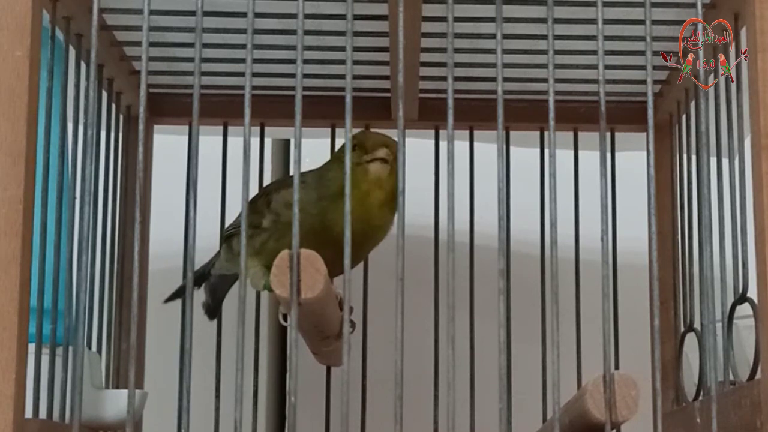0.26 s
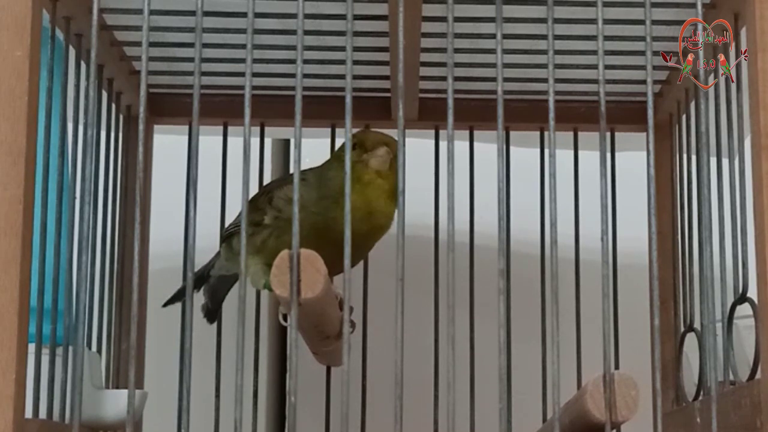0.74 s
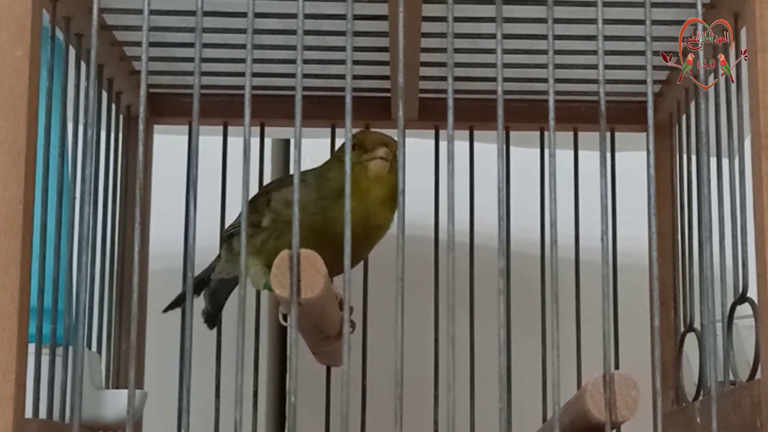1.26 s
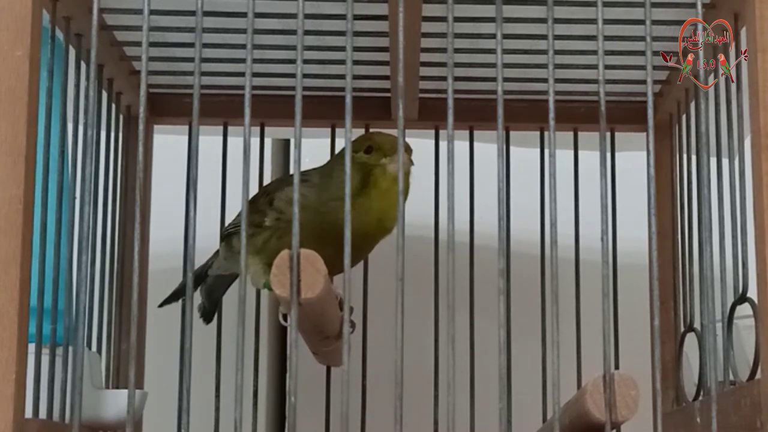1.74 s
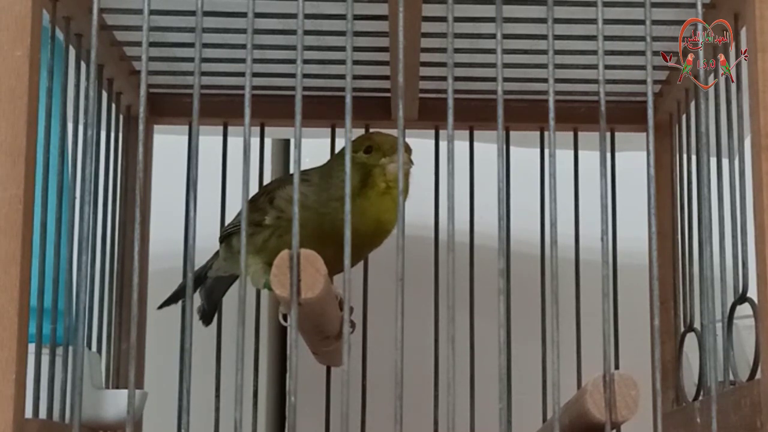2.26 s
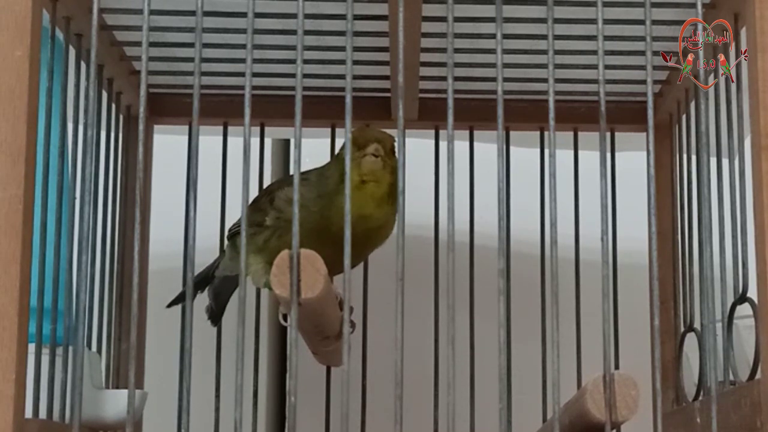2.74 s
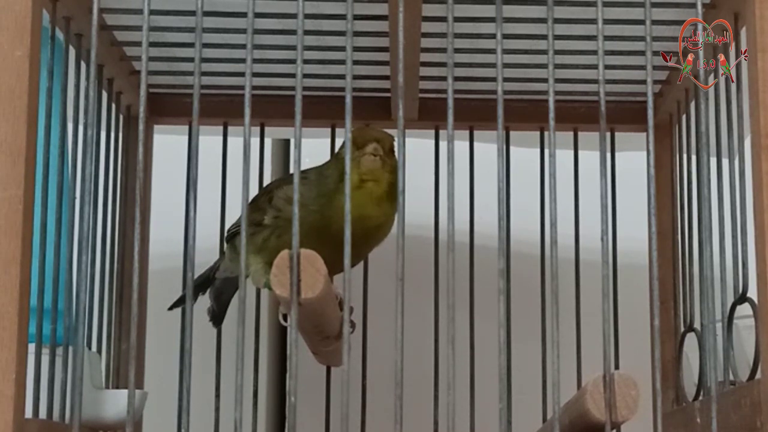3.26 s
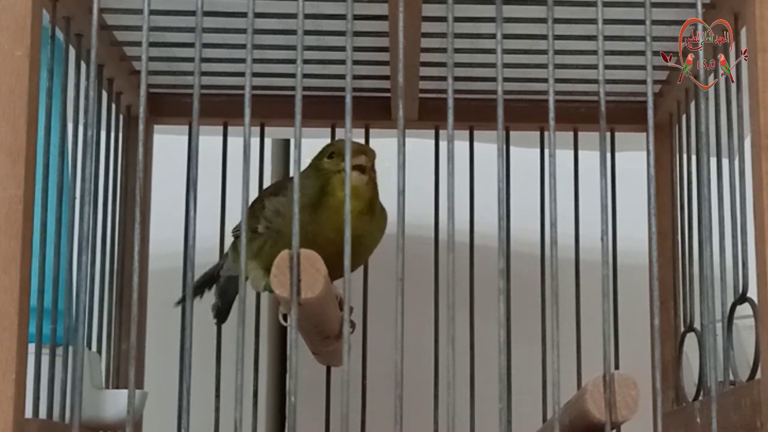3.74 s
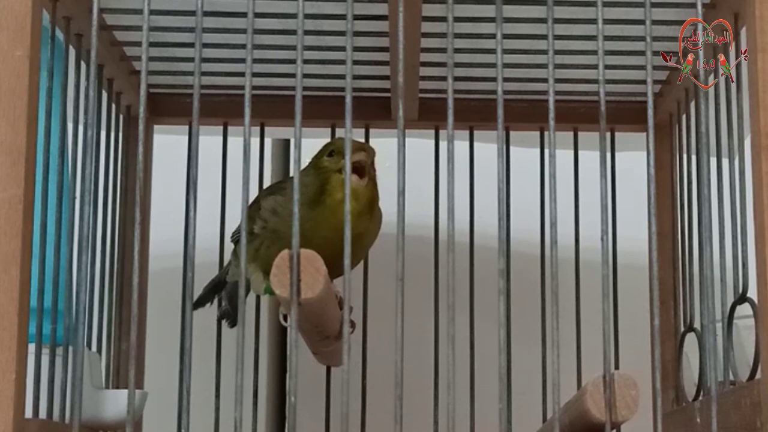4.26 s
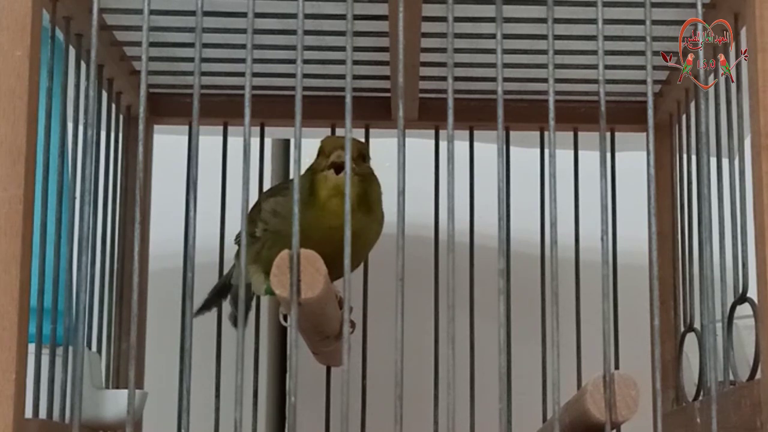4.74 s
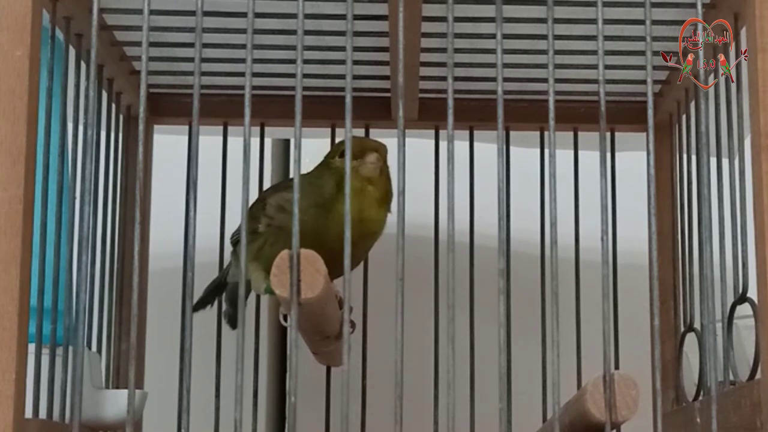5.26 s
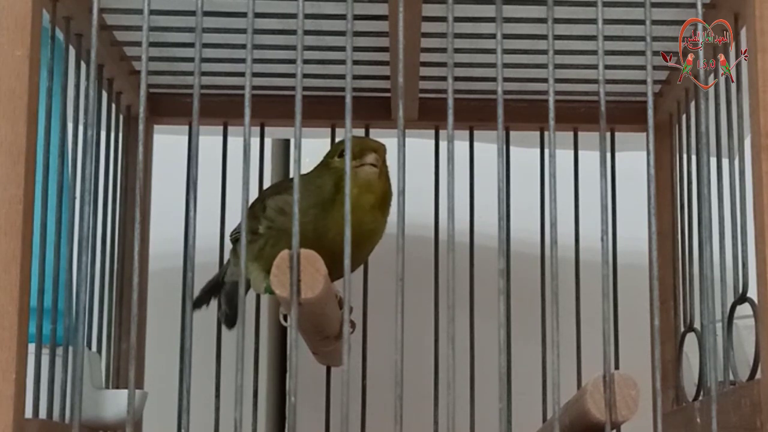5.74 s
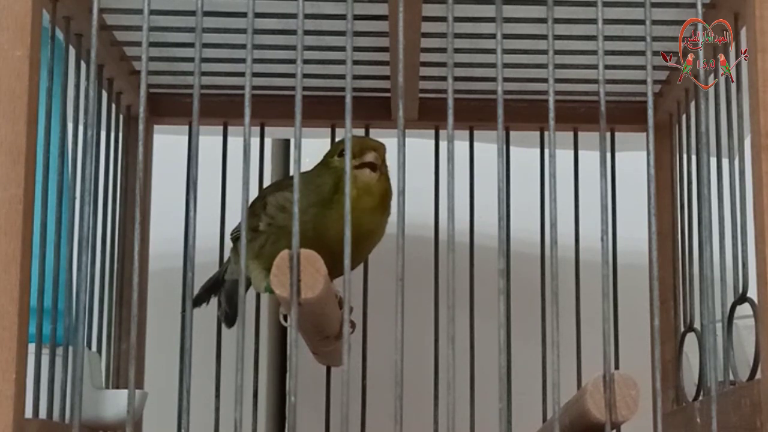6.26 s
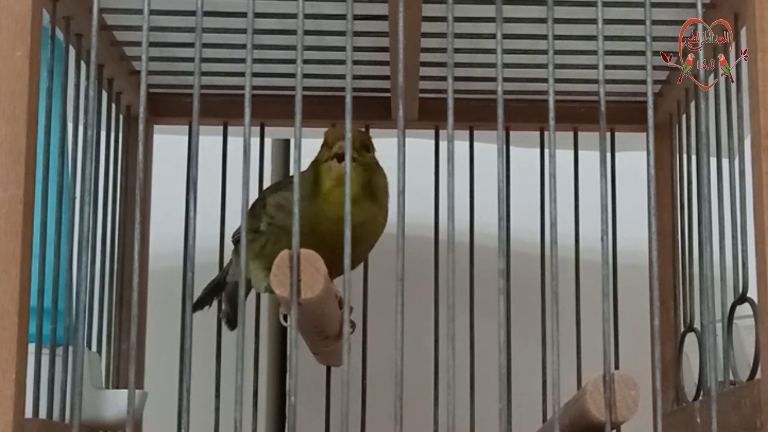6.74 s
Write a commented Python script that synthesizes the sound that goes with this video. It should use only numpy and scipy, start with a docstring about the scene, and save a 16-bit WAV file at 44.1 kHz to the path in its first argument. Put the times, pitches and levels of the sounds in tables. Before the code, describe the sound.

A canary sings close to a stereo microphone inside a wooden cage in a small, quiet room. From 0 to 1 s it gives ten short, dry, falling chips, about ten per second, each led by a scratchy tick. From 1.0 to 1.85 s come four very high upward zips about a quarter second apart, each followed by a tiny low stutter, the later ones preceded by a tick and peep. From 1.9 to 3.7 s, five slower soft whistles climb, the middle three longest and highest, with a faint reedy edge. From 3.75 to 5 s a brisk seesaw trill alternates steady high and rising lower notes, with faint feather rustle. Chips return from 5.05 to 6.15 s. From 6.2 s to the end at about 7.1 s, six louder chirps step downward from thin lisp to full falling note. Light cage ringing, short reverberation, faint air and hum remain underneath.

```python
"""In a small quiet room, inside a wooden cage, a canary sings close to two microphones.
Trills repeat groups of gliding, nearly pure notes, each note a tone with set pitch and level curves.
Among them come five slow rising whistles, where the second side of the syrinx joins faintly and
modulation makes side tones. Cage echoes and resonances and a diffuse room tail return the song;
still air, a low hum and a soft rustle of feathers are shaped noise and a sine."""
import sys
import numpy as np
from scipy import signal
from scipy.fft import rfft, irfft, next_fast_len
from scipy.io import wavfile
from scipy.ndimage import uniform_filter1d

SR = 44100
rng = np.random.default_rng(int(sys.argv[2]) if len(sys.argv) > 2 else 0)


def master(y):
    """Save y as 16-bit WAV."""
    cut = np.clip(np.atleast_2d(y).T, -1, 1)
    pcm = np.round(cut * 32767)  # scale
    wavfile.write(sys.argv[1], SR, pcm.astype(np.int16))


N = 309141  # length [samples]

# Note shapes, all: (time from the start of the note [ms], pitch [Hz], level [dB])
# short, scratchy onset
TICK_SHAPE = [(0.0, 4824, -25.5), (0.9, 4702, 6), (2.1, 4607, 4.5), (4.1, 4690, -2), (4.5, 4470, -29)]
# low falling note
CHIP_SHAPE = [(0.0, 2400, -21), (2.224, 2320, -0.5), (5.56, 2435, 2.5), (8.22, 2290, 3), (9.43, 1840, -6.5),
              (15.4, 1671, -14.5), (21.9, 1520, -24), (27.34, 1675, -25.5)]
# steep rise
SWEEP_SHAPE = [(0, 5300, -13), (3.22, 5890, -1.5), (13.07, 6460, -6), (19.16, 7220, -6), (28.2, 7675, -10),
               (36.5, 7640, -20)]
# arch
PEEP_SHAPE = [(0.0, 880, -38.5), (1.483, 2532.0, -10.5), (5.24, 2790, 0.5), (11.52, 2788.0, -6.5),
              (15.26, 2150, -9), (18.4, 1310, -21), (21.4, 1200, -29)]
# one beat of a stutter
PULSE_SHAPE = [(0, 2330, -25.5), (2, 2420, 9), (3, 2170, 11), (5, 2250, -12.5)]
# long soft slide downwards
FALL_SHAPE = [(0, 1900, -9), (2, 1720, -10.5), (17.4, 1552, -17), (35.7, 1068, -24.5), (52.6, 920, -24),
              (51.6, 950, -50)]
# level high note of the seesaw
HIGH_SHAPE = [(0, 5760, -12), (3, 5520, -3), (12, 5450, -.5), (33, 5415, -.5), (39, 5470, -3),
              (44.5, 5720, -14)]
# rising low note of the seesaw
LOW_SHAPE = [(0, 3720, -13), (4.5, 3687, -11.5), (11.8, 3795, 1), (19.2, 3870, -2.5), (25, 4090, -6.5),
             (27.4, 4330, -18.5)]
# thin, high, nearly level note
LISP_SHAPE = [(0, 6350, -22), (2.1, 6260, -3), (13, 6200, 0), (20, 6230, -14)]
# rise, near hold, last upward flick
SLUR_SHAPE = [(0.0, 3200, -17.5), (5, 4114.0, -2.5), (23.1, 4208.0, 2.5), (33.5, 4296.0, -8),
              (40.4, 4600, -22.5)]
# loud falling note
CHIRP_SHAPE = [(0, 3200, -22), (3.5, 2700, -7.5), (7.8, 2773, -2.5), (14.67, 2288, -1.5),
               (15.76, 1990, -11.5), (20.6, 1760, -23.5), (22.6, 1620, -43)]

# Syllables; levels add to the note shape, factors multiply it.
# two chip trills, a tick and a chip each: (time [s], level [dB], pitch factor [1])
CHIP_SYLLABLES = [(0.0016, -17.5, 1.1), (0.1015, -17, 1.018), (0.2101, -16.5, 1.03), (0.3135, -16.5, 1.035),
                  (0.4149, -16.5, 0.994), (0.525, -17, 1.017), (0.6355, -16, 0.993), (0.7368, -16, .99),
                  (0.8425, -18.5, .965), (0.9556, -17.5, 1), (5.046, -20, 0.989), (5.1548, -17.5, 1.014),
                  (5.258, -19, 0.981), (5.372, -19.5, 0.989), (5.4831, -18, 1.011), (5.583, -18, 1.01),
                  (5.688, -18, .995), (5.7926, -18, 1.02), (5.9021, -17.5, 0.972), (6.021, -20.5, 0.934),
                  (6.141, -20, .955)]
# swooping trill: (time of the sweep [s], level [dB], pitch factor [1], sweep length factor [1])
SWOOP_SYLLABLES = [(1.0345, -20, 0.94, 0.73), (1.2645, -19.5, 0.98, 1.01), (1.4996, -19, 0.99, .98),
                   (1.7438, -19.5, .99, 1)]
# last trill, a lisp, slur and chirp each: (time of the chirp [s], level [dB], pitch factor [1])
CHIRP_SYLLABLES = [(6.2967, -11.5, .985), (6.452, -10.5, 1.002), (6.599, -11, 1.002), (6.7561, -10.5, 0.99),
                   (6.9105, -10, 1), (7.063, -10, .98)]
# pitch of the seesaw's low note: (time [s], factor [1])
SEESAW_PITCH = [(3.76, 0.97), (4.42, 1.029), (4.62, 1.003), (4.9, 1.006)]

# S-shaped climbs: (time [s], length [s], level over the carry [dB], first pitch [Hz], top pitch [Hz],
# climb time [s], lateness [1 = even], sag after it [Hz/s], factor on the second side's pitch [1])
WHISTLE_CLIMBS = [(1.923, 0.17, -3.2, 1897, 2120, 0.21, .5, -7, 1.11),
                  (2.185, 0.38, -2.2, 1885, 3343, 0.23, 0.94, -1.5, 1.02),
                  (2.649, 0.36, -0.42, 1880, 3383, .21, 0.93, 481.5, 0.95),
                  (3.135, .377, -1.5, 1956, 3383, .2, 1.186, 168, 1),
                  (3.594, 0.13, -1.9, 1930, 2251, 0.084, 1.47, 2601.5, 0.95)]
# how strongly a whistle carries through beak and cage: (pitch [Hz], level [dB])
WHISTLE_CARRY = [(1900, -25), (2080, -21.5), (2250, -22.5), (2420, -23.5), (2620, -24), (2820, -16),
                 (3020, -20), (3300, -26.5)]
# second side, falling as the first rises: (whistle pitch [Hz], level re whistle [dB], own pitch [Hz])
SECOND_SIDE_TONE = [(1930, -47, 1400), (2030, -20, 1440), (2354, -24.5, 1440), (2590, -23.5, 1070),
                    (2836, -29.5, 850), (3200, -68, 460)]
# harmonics 2, 3 and 4 before beak colour and brightness: (level [dB])
OVERTONE_LEVELS = [-32.5, -39.5, -52.5]
# how the beak colours the overtones: (frequency [Hz], level [dB])
BEAK_COLOUR = [(4000, 2), (7500, -1.5), (9000, -3.5), (11000, 1), (13400, 4), (15300, 5), (16200, -14.5)]

# microphone pair: (frequency [Hz], left minus right [dB], phase by which left leads [rad])
PORT_BALANCE = [(875, -2, -1.5), (2060, -4.5, 1.35), (3150, -2.5, -1.4), (3582, -3.5, -1.5), (4006, -7, 3),
                (4155, -0.5, -1.5), (5740, 3, -5), (7720, 12.5, -3.5), (10200, -1, -8)]
# cage and near walls: (delay [ms], level [dB])
EARLY_ECHOES = [(3.1, -28.5), (6.8, -21.5), (12.8, -25.5), (25.5, -24.5)]
# narrow cage resonances: (frequency [Hz], width [Hz], level [dB])
CAGE_RINGS = [(3780, 50, -5), (5404, 22, -5)]
# diffuse tail: (frequency [Hz], level [dB], 60 dB decay time [s])
ROOM_TAIL = [(960, -8, 0.46), (2300, -16.5, 0.48), (3500, -7.5, 0.34), (8000, -9.5, 0.34), (14700, 1, 0.09)]
# room air: (frequency [Hz], level [dB per Hz])
AIR_SPECTRUM = [(30, -108), (130, -103), (450, -103.5), (700, -108), (6000, -124), (16000, -129)]
# stirred feathers, relative colour: (frequency [Hz], level [dB])
RUSTLE_SPECTRUM = [(60, -4.5), (180, -6.5), (500, -17), (1700, -4.5), (3500, -24.5)]

SETTLE_SYLLABLES = 1.3  # decay of the tension at the start of a trill
STUTTER_GAP_S, STUTTER_STEP_S, STUTTER_GROWTH_DB = 0.017, 0.0056, 5.5  # pause, spacing, growth per pulse
SEESAW_START_S, SEESAW_BEAT_S = 3.7637, 0.1133
CLING_HZ, CLING_WIDTH_HZ, CLING = 2490, 260, 0.7  # a climbing whistle lingers around one pitch
SHORTEST_RELEASE_S = 0.0008
HUM_HZ, HUM_DB = 49, -79
EDGE_HZ = 16350  # upper band limit


def gain_of(db):
    """Definition of the decibel: amplitude ratio from level."""
    return 10 ** (np.asarray(db) / 20)


def read(points, hz, axis=1):
    """Interpolation of one table column on a logarithmic frequency axis."""
    columns = np.transpose(points)
    return np.interp(np.log(hz + 1), np.log(columns[0]), columns[axis])


def add(mix, s, sound):
    """Superposition: a sound is summed into the mix at time s."""
    start = round(s * SR)
    sound = sound[max(-start, 0):]
    part = mix[max(start, 0):][:len(sound)]
    part += sound[:len(part)]


def waver(size, hz):
    """Low-passed noise: smooth chance of rms 1 with a Gaussian cutoff near hz, looped each second."""
    cutoff = np.exp(-(np.fft.rfftfreq(SR, 1 / SR) / hz) ** 2)
    slow = irfft(rfft(rng.standard_normal(SR)) * cutoff, SR)
    return np.resize(slow / slow.std(), size)


def coloured(spectrum):
    """Spectral shaping of noise to a level in dB per Hz, half its power common to both microphones."""
    common, *own = rng.standard_normal((3, N))
    white = np.sqrt(0.5) * (common + np.array(own))
    shape = gain_of(read(spectrum, np.fft.rfftfreq(N, 1 / SR)))
    return irfft(rfft(white) * shape, N) * np.sqrt(SR / 2)


def treble(x, low_hz=3500):
    """Radiation from a small opening: the beak passes high frequencies best."""
    return signal.sosfilt(signal.butter(2, low_hz, "high", fs=SR, output="sos"), x)


def syrinx(hz, db, edge_s, bright_db, jitter):
    """Phase integration of an unsteady pitch: a tone with faint flickering overtones, phase, strength."""
    size = len(hz)
    drift = 0.003 * waver(size, hz=25)
    phase = 2 * np.pi * np.cumsum(hz * (1 + drift + jitter * waver(size, hz=207))) / SR
    t = np.arange(size) / SR
    attack = np.tanh(t / edge_s)
    release = np.tanh(t[::-1] / max(edge_s, SHORTEST_RELEASE_S))
    strength = gain_of(db + 0.5 * waver(size, hz=127)) * (attack * release) ** 2
    overtones = np.zeros(size)
    for k, level in enumerate(OVERTONE_LEVELS, 2):
        below_nyquist = k * hz < SR / 2
        overtones += gain_of(level + read(BEAK_COLOUR, k * hz)) * np.sin(k * phase) * below_nyquist
    brightness = gain_of(bright_db + waver(size, hz=150))
    return strength * (np.sin(phase) + brightness * overtones), phase, strength


def trill(shape, notes, edge_s=0.00043, bright_db=0, hiss_db=-58, jitter=0.0069):
    """Repetition of one gliding tone, scaled in level, pitch and length, with turbulent hiss."""
    ms, hz, level = np.transpose(shape)
    out = np.zeros(N)
    for s, note_db, pitch, *length in notes:
        t = np.arange(0, ms[-1], 1000 / SR / np.prod(length))
        glide, swell = (uniform_filter1d(np.interp(t, ms, c), size=32) for c in (hz, level))
        tone, _, strength = syrinx(glide * pitch, swell + note_db, edge_s, bright_db, jitter)
        turbulence = treble(rng.standard_normal(len(t)))
        add(out, s, tone + gain_of(hiss_db) * strength * turbulence)
    return out


def tension(syllables):
    """Exponential relaxation: 1 on the first syllable after a pause over 1 s, then dying away."""
    s = np.array([row[0] for row in syllables])
    index = np.arange(len(s))
    first = np.maximum.accumulate(index * (np.diff(s, prepend=s[0]) > 1))
    return np.exp(-(index - first) / SETTLE_SYLLABLES)


def notes_of(syllables, lag_s=0, db=0, stretch=1, sharp=0,
             tense_db=0, tense_sharp=0, tense_short=0, tense_early_s=0):
    """Fixed timing within the syllable; tension alters level, pitch, length and onset as set."""
    notes = []
    for (s, level, pitch, *_), tense in zip(syllables, tension(syllables)):
        notes.append((s + lag_s - tense_early_s * tense,
                      level + db + tense_db * tense,
                      pitch * (1 + sharp + tense_sharp * tense),
                      stretch * (1 - tense_short * tense)))
    return notes


def loosely(notes, spread_db=0.85, pitch_spread=0.0048, length_spread=0.077):
    """Random variation: no two notes of a steady trill come out quite alike."""
    chance = rng.standard_normal((len(notes), 3))
    return [(s, db + spread_db * a, pitch * (1 + pitch_spread * b), length * (1 + length_spread * c))
            for (s, db, pitch, length), (a, b, c) in zip(notes, chance)]


def background():
    """Stationary noise: still room air, with a low electric hum of slowly wavering amplitude."""
    hum = np.sin(2 * np.pi * HUM_HZ * np.arange(N) / SR) * (1 + 0.41 * waver(N, hz=2.9))
    return coloured(AIR_SPECTRUM) + gain_of(HUM_DB) * hum


def tick_notes():
    """Strong frequency jitter and hiss: a scratchy tick leads each chip and all peeps."""
    before_chips = notes_of(CHIP_SYLLABLES, lag_s=-0.0265, db=-5.0, sharp=0.023,
                            tense_db=4.5, tense_sharp=0.085)
    before_peeps = notes_of(SWOOP_SYLLABLES[1:], lag_s=-0.0752, db=-2.5, sharp=0.14)
    ticks = loosely(before_chips + before_peeps, spread_db=1, pitch_spread=0.0091, length_spread=0.098)
    return trill(TICK_SHAPE, ticks, edge_s=0.00035, bright_db=3, hiss_db=-36.5, jitter=0.024)


def chip_notes():
    """Low voice of gliding tones: chips, peeps before all sweeps but the first, stutters and falls after."""
    voice = dict(edge_s=0.0006, bright_db=-3.5, hiss_db=-56)
    chips = notes_of(CHIP_SYLLABLES, stretch=0.89, tense_short=0.36)
    peeps = notes_of(SWOOP_SYLLABLES[1:], lag_s=-0.0508, db=7.0, sharp=0.025)
    sweep_s = SWEEP_SHAPE[-1][0] / 1000
    stutters = [(s + length * sweep_s + STUTTER_GAP_S, db, pitch) for s, db, pitch, length in SWOOP_SYLLABLES]
    pulses = []
    for k in range(3):
        pulses += notes_of(stutters, lag_s=k * STUTTER_STEP_S, db=(k - 4) * STUTTER_GROWTH_DB + 2.0)
    falls = notes_of(stutters, lag_s=0.015, db=-1.9)
    groups = [(CHIP_SHAPE, chips), (PEEP_SHAPE, peeps), (PULSE_SHAPE, pulses), (FALL_SHAPE, falls)]
    return sum(trill(shape, notes, **voice) for shape, notes in groups)


def sweep_notes():
    """Rapid upward frequency glide with an abrupt onset."""
    return trill(SWEEP_SHAPE, SWOOP_SYLLABLES, edge_s=0.00015, bright_db=-4.0)


def whistles(lower_db=5, sum_tone_db=1, mirror_db=3, buzz_db=-6):
    """Intermodulation: the two sides of the syrinx make sum and difference tones on a slow climb."""
    out = np.zeros(N)
    for s, length, db, first_hz, top_hz, climb_s, lateness, sag, second_pitch in WHISTLE_CLIMBS:
        t = np.arange(0, length, 1 / SR)
        climb = np.sin(np.pi / 2 * np.minimum(t / climb_s, 1) ** lateness) ** 2
        hz = first_hz + (top_hz - first_hz) * climb - sag * np.maximum(t - climb_s, 0)
        hz = hz - CLING * (hz - CLING_HZ) * np.exp(-((hz - CLING_HZ) / CLING_WIDTH_HZ) ** 2)
        swell_in = -5 * np.exp(-t / 0.0053)  # dB
        level = db + read(WHISTLE_CARRY, hz) + swell_in
        tone, phase, strength = syrinx(hz, level, edge_s=0.005, bright_db=-5, jitter=0.002)
        lower_hz = second_pitch * read(SECOND_SIDE_TONE, hz, axis=2)
        lower = 2 * np.pi * np.cumsum(lower_hz * (1 + 0.018 * waver(len(t), hz=300))) / SR
        closeness = (lower_hz / hz) ** 3  # these tones fade as the two pitches part
        difference_tone = np.sin(2 * phase - lower)
        sides = closeness * (gain_of(lower_db) * np.sin(lower) + gain_of(mirror_db) * difference_tone)
        mixed = sides + gain_of(sum_tone_db) * np.sin(phase + lower)
        # the membranes touch each cycle, unevenly, which makes a rasp
        buzz = treble(treble(abs(np.sin(phase) + 0.5 * np.sin(lower) + 0.5)))
        buzz *= 1 + waver(len(t), hz=1800)
        second = strength * gain_of(read(SECOND_SIDE_TONE, hz) + 2 * waver(len(t), hz=60))
        add(out, s, tone + second * (mixed + gain_of(buzz_db) * buzz))
    return out


def seesaw_trill(count=11, high_db=-18.5, low_db=-13.5):
    """Alternation on a steady beat: a level high note and a rising low note take turns."""
    voice = dict(edge_s=0.0012, hiss_db=-60, jitter=0.009)
    beats = SEESAW_START_S + SEESAW_BEAT_S * np.arange(count)
    highs = notes_of([(s, high_db, 1) for s in beats], stretch=1.07, sharp=-0.0026,
                     tense_db=-4.5, tense_sharp=0.0083, tense_short=0.45)
    low_pitches = np.interp(beats, *np.transpose(SEESAW_PITCH))
    lows = notes_of([(s, low_db, pitch) for s, pitch in zip(beats, low_pitches)], lag_s=0.057,
                    stretch=0.94, tense_short=0.099, tense_early_s=0.004)
    high_voice = trill(HIGH_SHAPE, loosely(highs, pitch_spread=0.0037), **voice)
    return high_voice + trill(LOW_SHAPE, loosely(lows, length_spread=0.1), **voice)


def flutter(song, db=-47):
    """Amplitude modulation of noise: the body quivers with the given trill and stirs a soft rustle."""
    effort = np.sqrt(abs(uniform_filter1d(song ** 2, size=900)))
    rustle = coloured(RUSTLE_SPECTRUM)
    return gain_of(db) * effort * rustle / rustle.std()


def last_trill():
    """Descending registers: lisp, slur and chirp step down; the lisp fades as the trill settles."""
    lisps = notes_of(CHIRP_SYLLABLES, lag_s=-0.0762, db=-20.5, stretch=0.67, sharp=-0.011,
                     tense_db=10, tense_sharp=0.022, tense_short=-0.23)
    slurs = notes_of(CHIRP_SYLLABLES, lag_s=-0.0555, db=-10.5, sharp=0.0015)
    groups = [(LISP_SHAPE, lisps), (SLUR_SHAPE, slurs), (CHIRP_SHAPE, CHIRP_SYLLABLES)]
    return sum(trill(shape, notes, edge_s=0.0015, bright_db=-2.0) for shape, notes in groups)


def cage(x):
    """Early reflection: a few distinct delayed copies."""
    out = np.zeros(N)
    for ms, db in EARLY_ECHOES:
        add(out, ms / 1000, gain_of(db) * x)
    return out


def ringing(x):
    """Resonance: the cage swells at a couple of pitches and rings on."""
    out = np.zeros(N)
    for hz, width, db in CAGE_RINGS:
        out += gain_of(db) * signal.lfilter(*signal.iirpeak(hz, hz / width, fs=SR), x)
    return out


def ports(x):
    """Interchannel level and phase: each pitch reaches the two microphones differently, at equal power."""
    size = next_fast_len(N + SR // 10)
    hz = np.fft.rfftfreq(size, 1 / SR)
    ratio = gain_of(read(PORT_BALANCE, hz))
    turn = np.exp(0.5j * read(PORT_BALANCE, hz, axis=2))
    pair = np.array([ratio * turn, 1 / turn]) * np.sqrt(2 / (1 + ratio ** 2))
    return irfft(rfft(x, size) * pair, size)[:, :N]


def room(x, shared=0.16, build_s=0.0091):
    """Diffuse reverberation: convolution with noise decaying at a rate set for each frequency."""
    common, *own = rng.standard_normal((3, SR))
    taps = np.sqrt(shared) * common + np.sqrt(1 - shared) * np.array(own)
    hz, t, z = signal.stft(taps, SR, nperseg=256)
    # the high notes are beamed past the microphones, so they come back wetter
    level = gain_of(read(ROOM_TAIL, hz)[:, None])
    t60 = read(ROOM_TAIL, hz, axis=2)[:, None]
    decay = np.exp(-np.log(1000) * t / t60)
    z *= level * decay * np.sqrt(2 * np.log(1000) / t60 / SR)  # energy independent of t60
    build = np.tanh(np.arange(z.shape[-1] * 128 - 128) / SR / build_s)
    tail = signal.istft(z, SR, nperseg=256)[1] * build
    return signal.fftconvolve(x[None], tail, axes=1)[:, :N]


def scene():
    """Superposition of the phrases, each with its own share sent to the cage and the room."""
    ticks, chips, sweeps = tick_notes(), chip_notes(), sweep_notes()
    slow, seesaw, finale = whistles(), seesaw_trill(), last_trill()
    song = chips + ticks + sweeps + seesaw + finale + slow
    early = gain_of(-4.0) * chips + gain_of(-6) * (ticks + sweeps) + seesaw
    early += gain_of(-5) * finale + gain_of(-16.5) * slow
    late = chips + finale + gain_of(-1.5) * (ticks + sweeps + seesaw) + gain_of(1.5) * slow
    late += trill(LOW_SHAPE, [(0, -23.5, 1.02, 0.55)])  # the room still rings with a note that has just ended
    direct = ports(song + cage(early) + ringing(song))
    return direct + room(late) + background() + flutter(seesaw)


def record(dry):
    """Band limitation: a linear-phase low-pass filter removes the highest frequencies."""
    lowpass = signal.firwin(511, EDGE_HZ, window=("kaiser", 9), fs=SR)
    return signal.oaconvolve(dry, lowpass[None], "same")


dry = scene()
out = record(dry)
master(out)
```